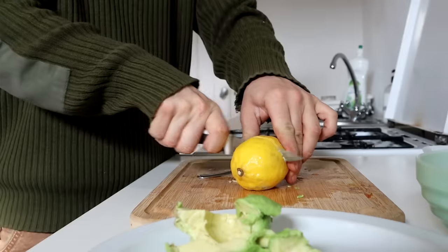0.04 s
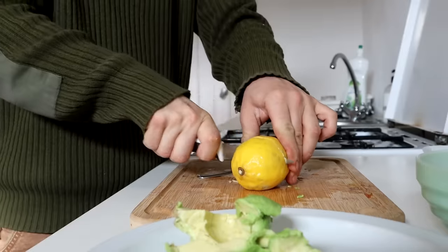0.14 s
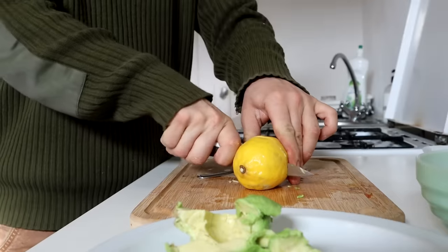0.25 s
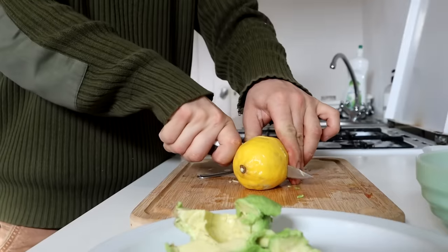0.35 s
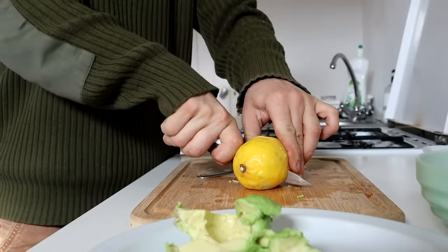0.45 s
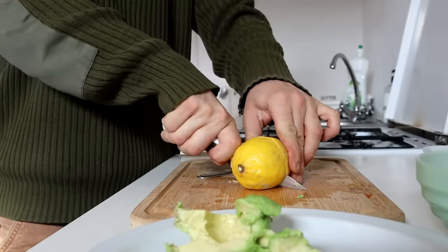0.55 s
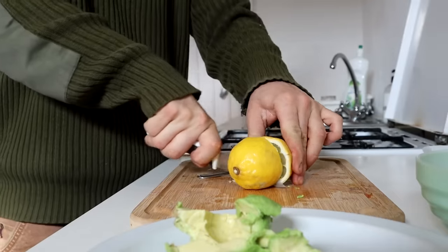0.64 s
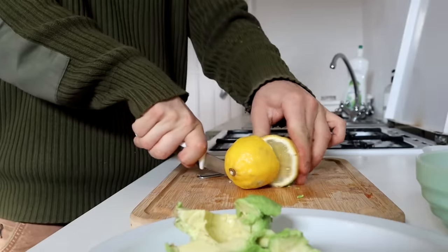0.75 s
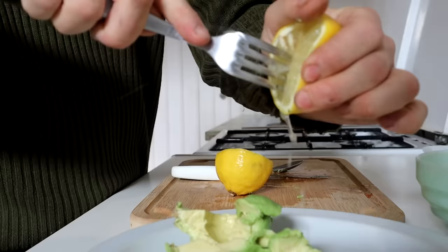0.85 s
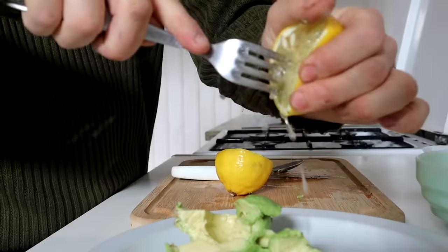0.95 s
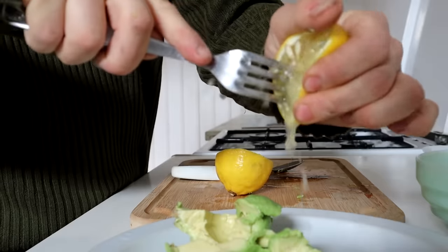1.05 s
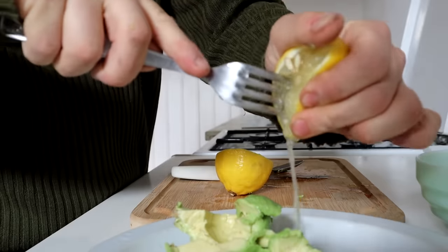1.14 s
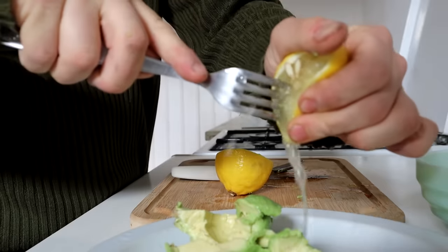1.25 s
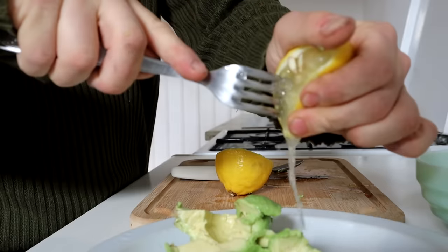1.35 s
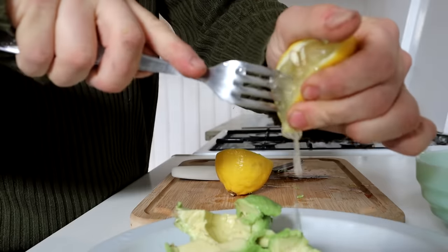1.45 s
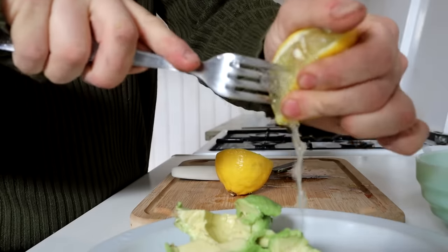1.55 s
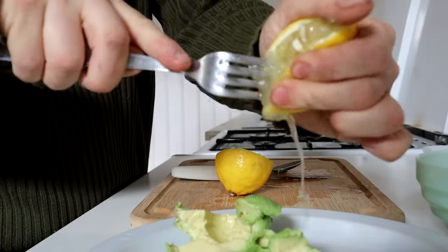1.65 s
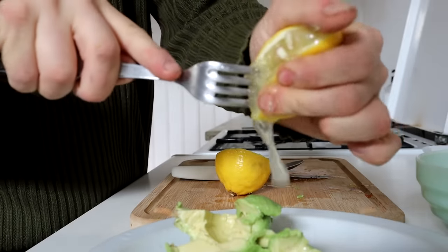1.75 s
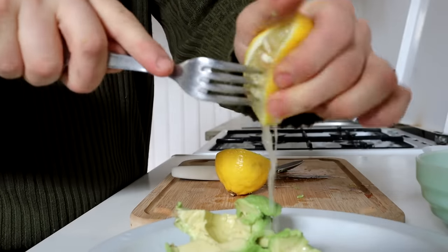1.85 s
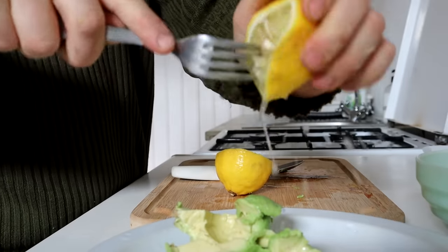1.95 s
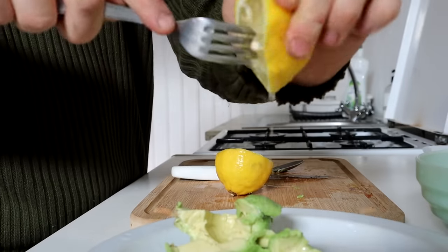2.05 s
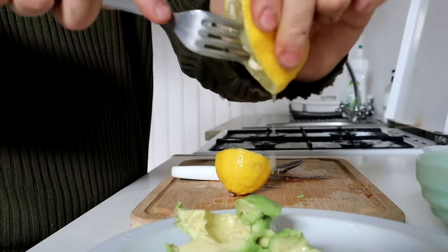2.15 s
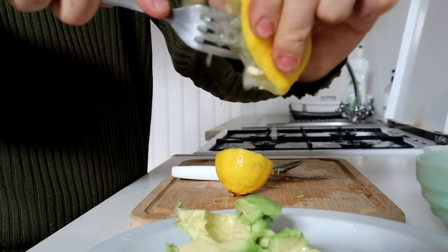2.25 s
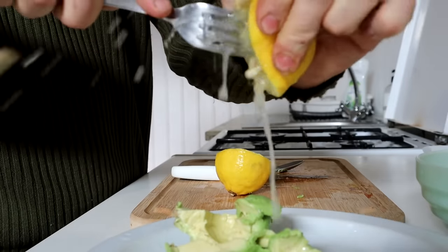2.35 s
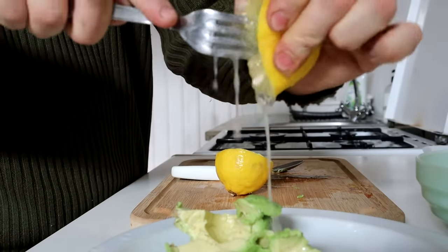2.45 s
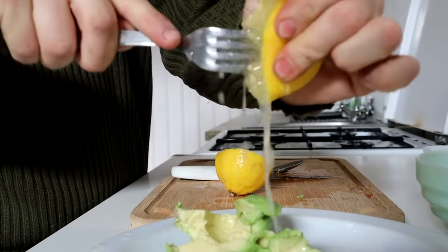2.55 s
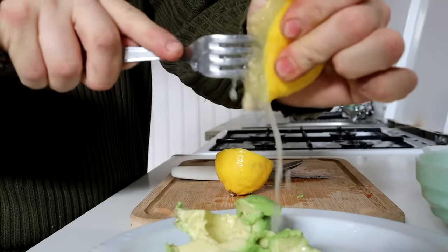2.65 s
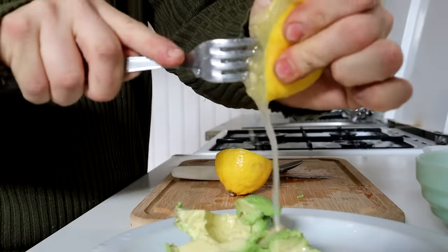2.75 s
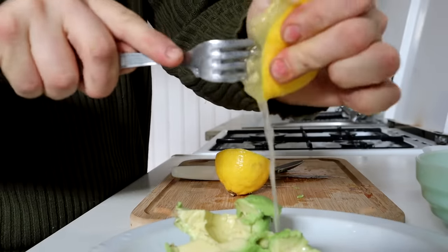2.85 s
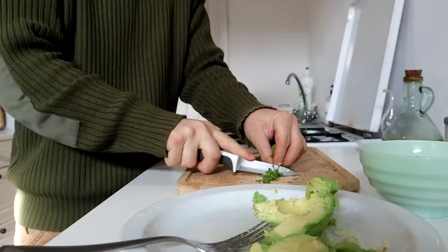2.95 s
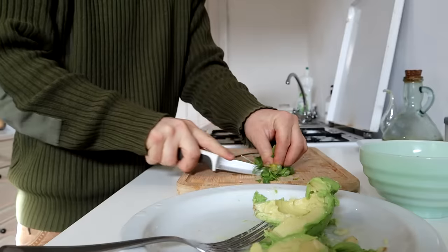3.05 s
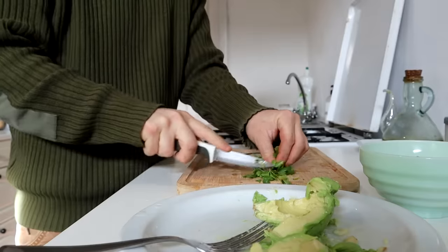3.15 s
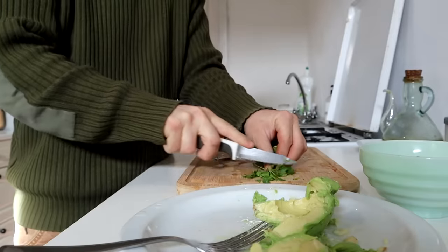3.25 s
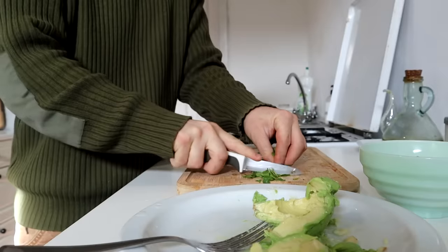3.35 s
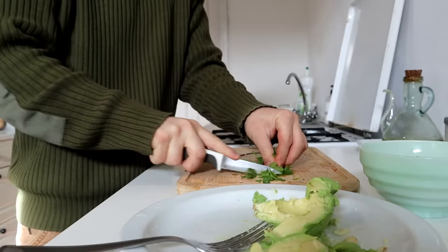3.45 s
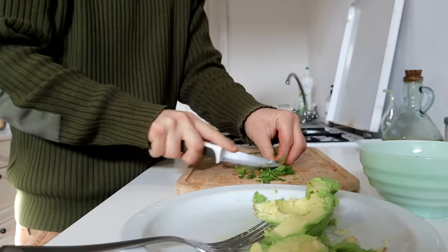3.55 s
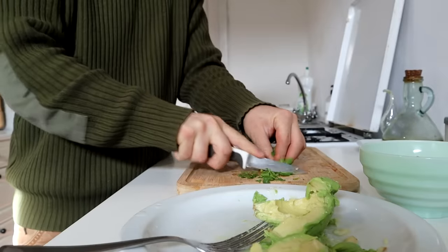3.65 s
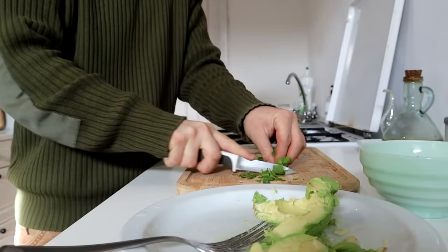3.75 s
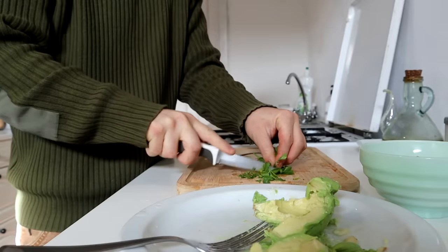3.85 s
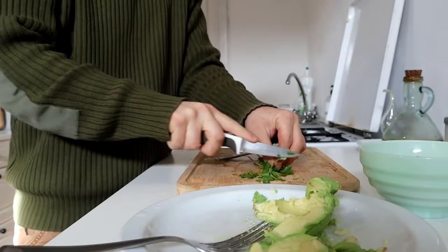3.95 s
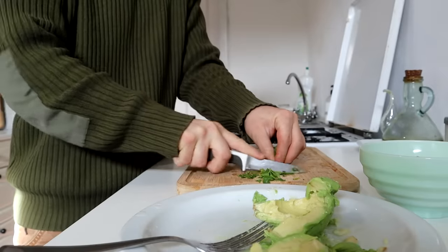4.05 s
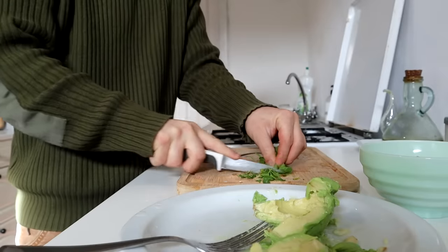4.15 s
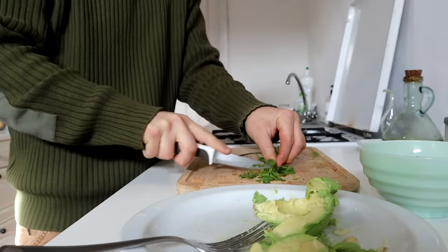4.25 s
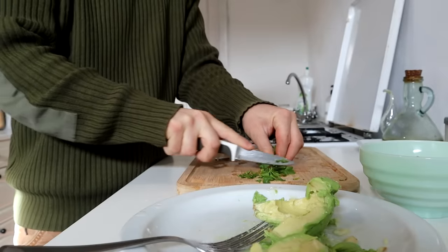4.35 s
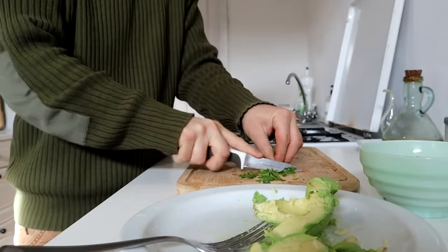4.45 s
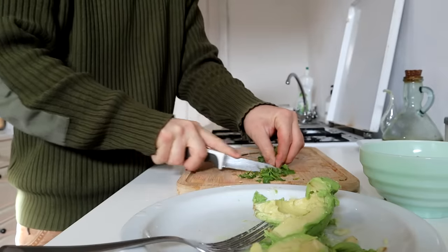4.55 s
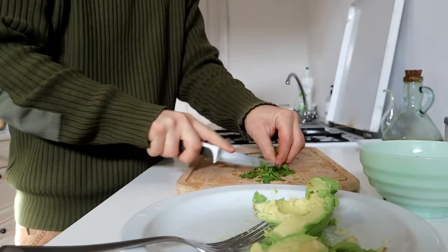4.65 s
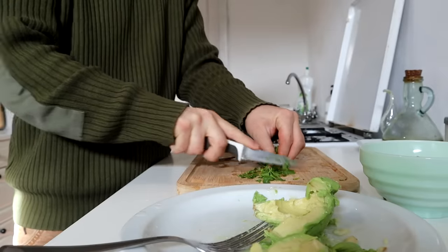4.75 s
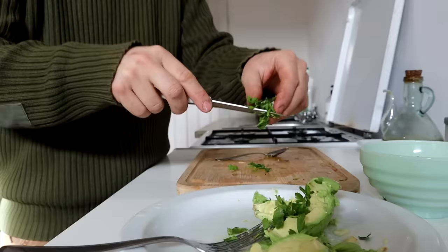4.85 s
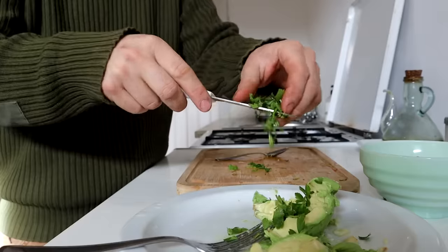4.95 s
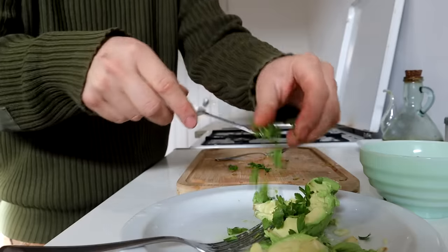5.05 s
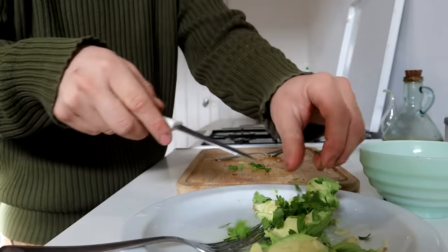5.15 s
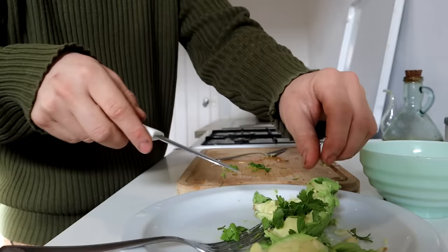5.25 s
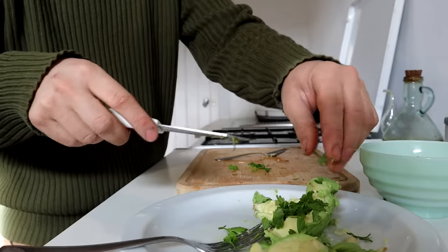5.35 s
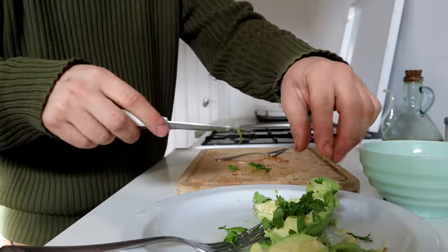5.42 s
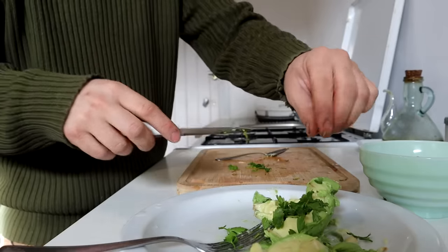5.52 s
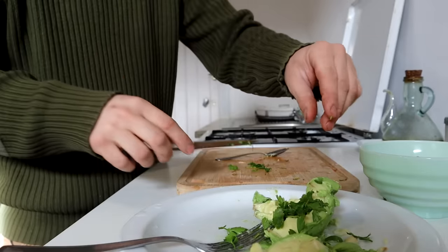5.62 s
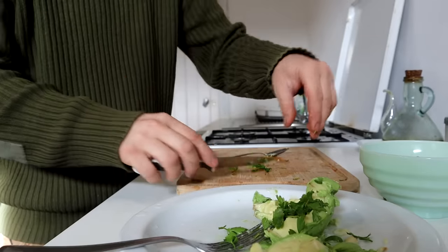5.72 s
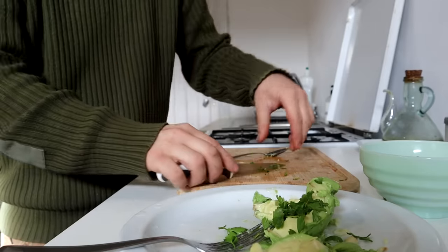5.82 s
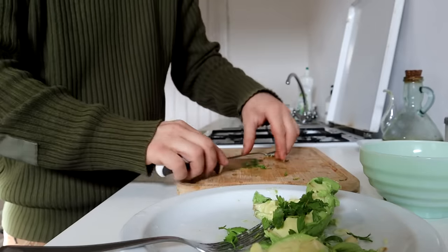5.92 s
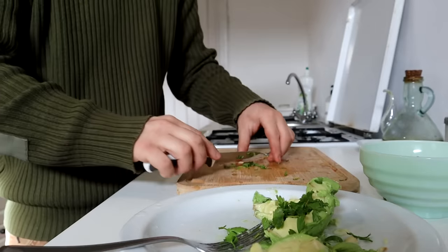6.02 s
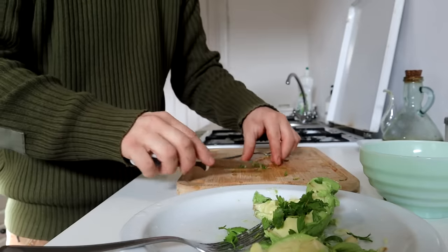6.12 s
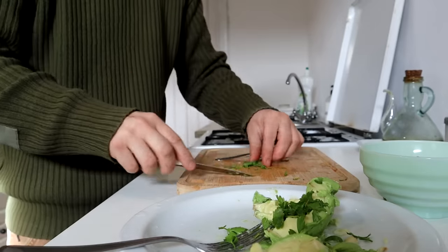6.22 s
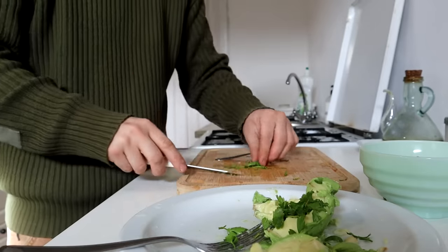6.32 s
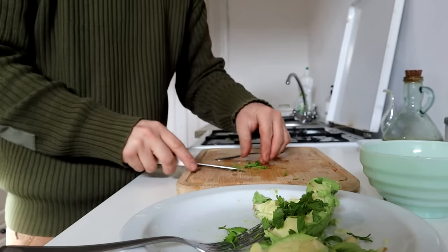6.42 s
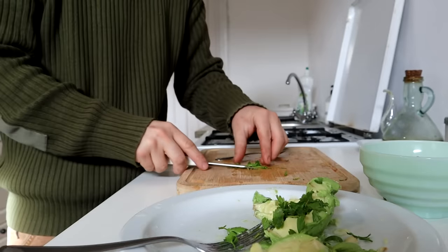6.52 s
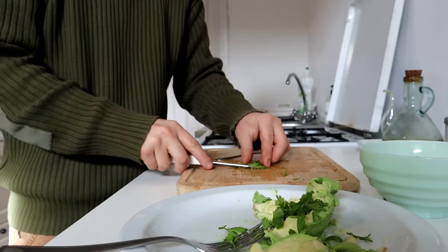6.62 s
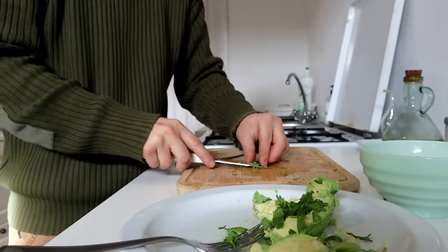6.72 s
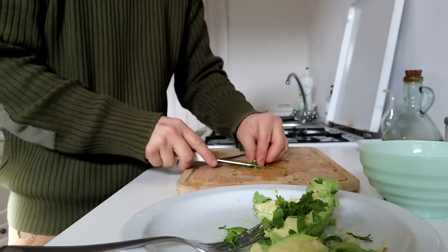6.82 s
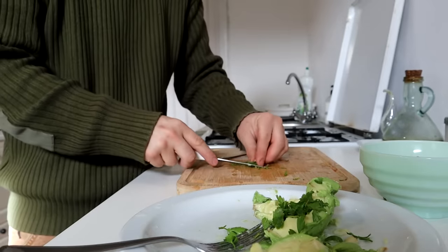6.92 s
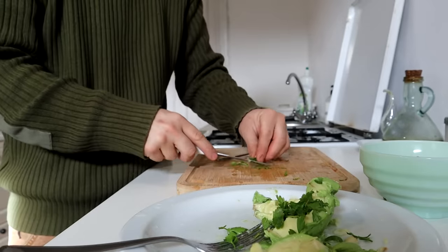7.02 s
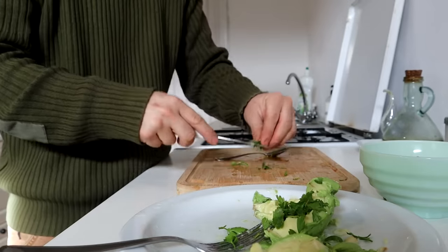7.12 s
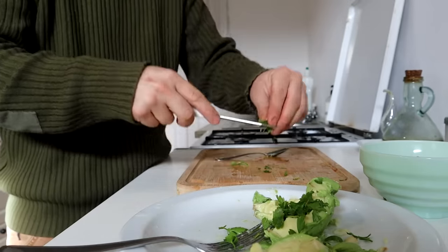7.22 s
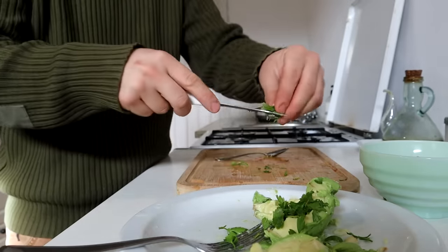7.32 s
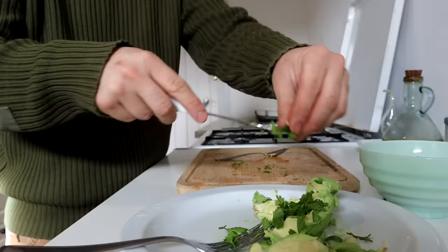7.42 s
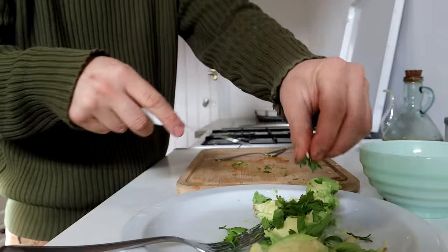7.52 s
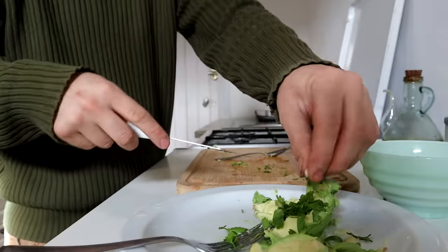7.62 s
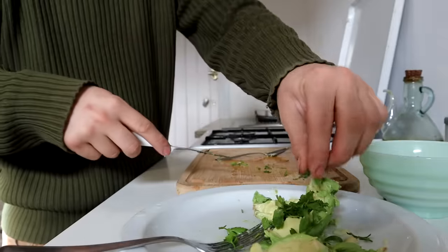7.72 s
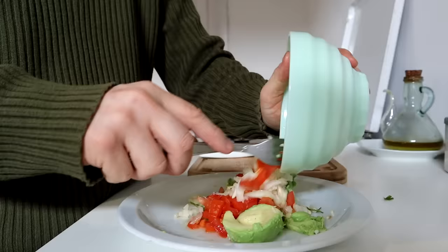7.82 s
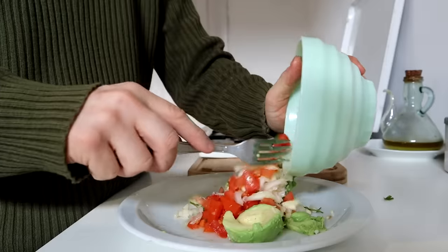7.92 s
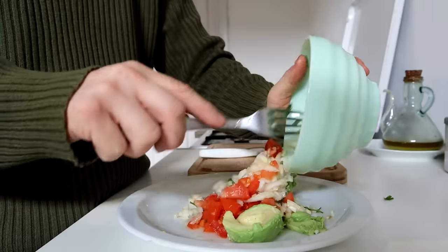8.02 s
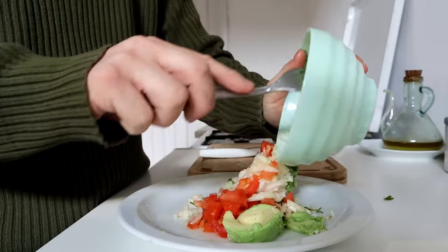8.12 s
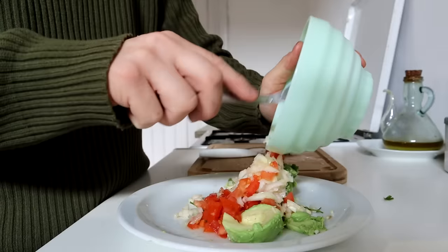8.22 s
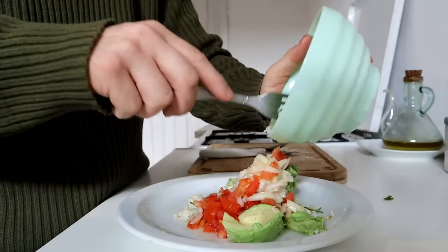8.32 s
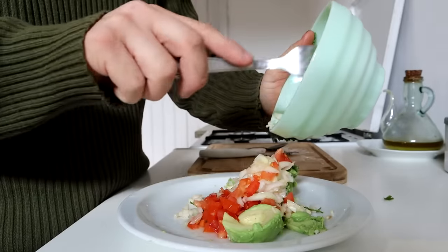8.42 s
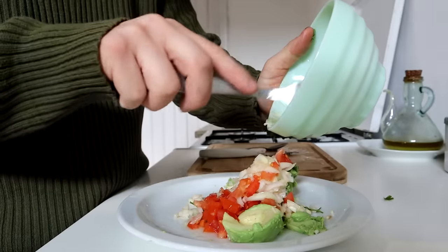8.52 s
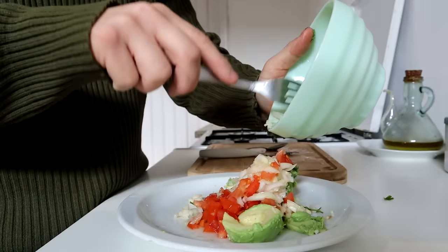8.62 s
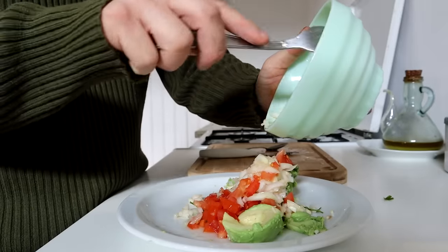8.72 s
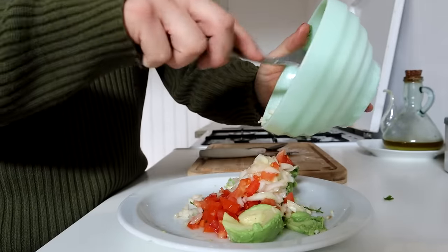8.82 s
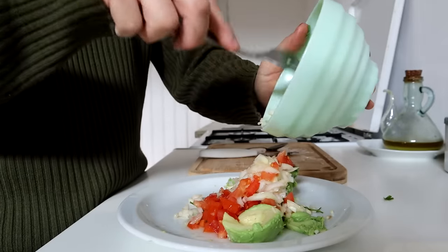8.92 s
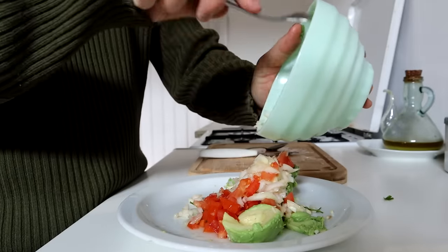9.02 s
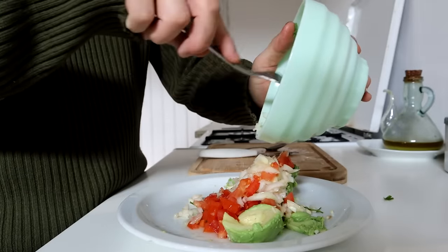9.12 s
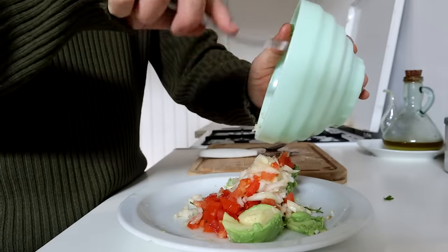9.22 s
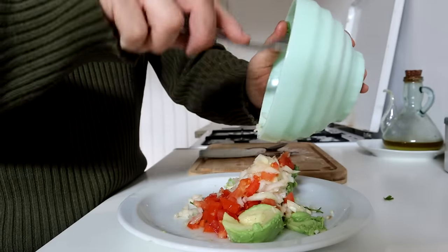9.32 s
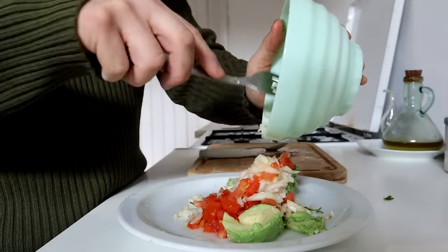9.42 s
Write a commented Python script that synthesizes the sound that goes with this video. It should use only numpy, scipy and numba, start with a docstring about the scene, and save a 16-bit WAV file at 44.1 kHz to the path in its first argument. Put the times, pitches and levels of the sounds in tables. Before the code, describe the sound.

Food preparation heard from very near. Dry sawing and small wooden knocks come first, then wet pulpy crackle with snapping cells. Sharp knife blows hit a board, then the blade gathers scraps quietly, with one solid knock and thin metallic scrapes. Bright irregular fork strikes and short scrapes on a ceramic bowl end it, loudest of all, over soft air and short hard-walled reverberation.

```python
"""A quiet kitchen with tiled walls, the microphone close to the work, in five passages joined by edits.
First a knife saws a lemon on a wooden board: noisy slips and blows ring board, counter and cabinet.
Then a fork squeezes out the juice in popping cells, wet crackle and gliding notes. The blade chops and
gathers herbs and taps a plate. Last a fork clinks and scrapes in a ceramic bowl, a bank of ringing modes.
Air and a low rumble lie under it all; the recorder's gain control ducks under the blows and peaks clip."""
import sys
import numpy as np
from scipy import signal
from scipy.fft import rfft, irfft
from scipy.io import wavfile
from scipy.ndimage import uniform_filter1d
from numba import njit

SR = 44100
rng = np.random.default_rng(int(sys.argv[2]) if len(sys.argv) > 2 else 0)


def master_out(mix):
    """Clip the mix to full scale and print it as 16-bit PCM to the path in sys.argv[1]."""
    frames = np.transpose(np.atleast_2d(mix))
    ceiling = np.clip(frames, -1, 1)
    pcm = np.round(ceiling * 32767).astype(np.int16)
    wavfile.write(sys.argv[1], SR, pcm)


N = 417614

# start of each passage, then the end: time_s
PASSAGES_S = [0, .93, 2.99, 4.93, 7.89, 9.47]
# knife blows on the board: start_s, level_db (before overload), then against it thud_db, edge_db, tick_db
KNOCKS = [(0.063, -41, 5, 15, -7), (0.1196, -41, 12, 12, 16), (0.2426, -23.5, 2, 8, -9),
          (0.2702, -16.5, -1.5, -8, -16), (0.451, -26.5, 7.5, -8, 1), (0.521, -24.5, -7, 7, 9),
          (0.7702, -25.5, -34, -5, 17.5), (0.78, -29, -24, 12, 12), (0.826, -21, -35, -13, -4),
          (3.031, -15, -9, -4.5, 1), (3.052, -36, -1, -7, 20), (3.196, -58, -7, -7, 27),
          (3.222, -51, -7, -7, 23), (3.2435, -41.5, -5, -12, 28), (3.374, -10.5, -7, 8.5, -25),
          (3.729, -12.5, -3.5, 8.5, -38), (4.1, -11.5, -3.5, 13, -31), (4.5052, -38.5, 9, 15.5, 21),
          (4.757, -49.5, -7, 17, 22.5), (4.8685, -35, -7, 4, 19), (4.8726, -14.5, -4.5, 10, 1),
          (5.6162, -58.5, -23, 21, 21), (5.8787, -11, -7.5, -17, -24), (6.2647, -15, -6, 3.5, -3.5),
          (7.001, -50, -8, -9, 17.5), (7.0504, -53.5, -22, -17, 30)]
# resonances of the wooden board, the counter, the cabinet: pitch_hz, width_hz, level_db
BOARD = [(1334, 375, 7.5), (1678, 373, 10), (1830, 556, 11.5), (2215, 322, 17.5), (2656, 142, 17.5),
         (3750, 585, 12.5), (4360, 680, 8.5), (5340, 1200, 2)]
COUNTER = [(235, 215, -2.5), (332, 99, -0.5), (439, 58, 2), (602, 51.4, 3.5), (809, 148, -1.5),
           (1010, 296, -9.5)]
CABINET = [(103, 10, -4), (123, 44, 1.5), (154.3, 28.5, 3.5), (192, 54, -4.5)]
# rings of the blade dragged flat: pitch_hz, width_hz, level_db
BLADE = [(630, 23, -0.5), (948, 37, -4), (1270, 48, -10), (2130, 29, 1), (2610, 28, -9), (3500, 150, -14),
         (5130, 150, -17), (6600, 740, -17.5)]
# the blade touches the plate: start_s, level_db
TAPS = [(5.198, -26), (5.228, -19.5)]
# modes of the plate: pitch_hz, level_db, t60_s (longest allowed ring is set in knife)
PLATE = [(837, 3, 0.057), (1760, 0, 0.056), (2700, 10.5, 0.019), (2966, -1, 0.48), (3350, -1, 0.21)]
# blade sawing, sliding and gathering, a row a stroke: start_s, swell_s, fade_db_per_s, rasp_db, hiss_db,
# counter_db, cabinet_db, blade ring (gain against the rasp)
STROKES = [(0.0, 0.005, 315, -43, -47, -69, -48, .1), (0.06, 0.0047, 38, -34.5, -45, -49, -35, 0.092),
           (0.118, 0.0063, 114, -28.5, -38.5, -38.5, -33.5, 0.092),
           (0.212, 0.052, 207, -25.5, -35, -26, -25.5, .1),
           (0.445, 0.0033, 395, -34.5, -37.5, -44, -22.5, .1),
           (0.514, 0.0051, 83, -29.5, -32, -33.5, -27, .1),
           (0.631, 0.04, 70, -23.5, -26.5, -33, -28.5, 0.11), (0.76, .02, 129, -32, -30, -46, -32.5, .1),
           (2.997, 0.033, 88, -28.5, -31, -33.5, -44, .15), (3.19, 0.023, 90, -55, -39.5, -80, -64, .15),
           (3.33, 0.046, 900, -50, -31.5, -63, -69, .15), (3.376, 0.09, 72, -37, -30, -37.5, -52, .15),
           (3.64, 0.055, 104, -51, -39, -69.5, -73.5, .15), (3.69, 0.025, 892, -60, -35, -60, -62, .15),
           (3.73, 0.099, 123, -30.5, -32.5, -37, -49, 0.17), (4.075, 0.023, 898, -53, -31, -58, -66, .15),
           (4.1, 0.079, 81, -29, -34, -68, -46, 0.16), (4.503, 0.0056, 246, -41, -30.5, -32, -34.5, 0.24),
           (4.541, 0.056, 112, -36, -29, -37.5, -52, 0.078), (4.835, 0.033, 900, -69, -35, -79, -64, 0.11),
           (4.875, 0.058, 100, -54, -39, -45, -51, .1), (5.05, 0.07, 73, -48, -44.5, -59, -69, .25),
           (5.879, 0.088, 74, -41, -59, -35, -38, 0.33), (6.265, 0.033, 119, -31.5, -49, -76, -44, 0.18),
           (6.431, 0.016, 49, -37, -36.5, -46.5, -64, 3.5), (6.578, 0.017, 160, -42, -66, -37.5, -70, 0.33),
           (6.76, 0.01, 99, -43.5, -82, -40, -57, .3), (6.795, 0.01, 298, -36.5, -38, -47, -64, 1.1),
           (6.93, 0.04, 254, -50, -45, -87, -57, 0.11), (7.35, 0.12, 39, -54.5, -49.5, -84, -67, .1),
           (7.68, 0.054, 37, -50, -87, -59.5, -77, 0.091)]
# a stroke starts this far under its top: rasp_db, hiss_db, counter_db, cabinet_db
STROKE_ONSET_DB = [-12.5, -20.5, -20, -8.5]
# half octaves of the blade's hiss: pitch_hz, level_db
HISS_BANDS = [(5400, 7.5), (7400, 4.5), (10200, 6.5), (14000, 7.5)]
# rough notes and bands of noise during the knife work: start_s, length_s, from_hz, to_hz, width_hz, level_db
ROUGH_NOTES = [(.115, 0.12, 398, 416, 39.3, -36), (.26, 0.095, 474, 452, 34.2, -36),
               (.64, 0.2, 1505, 1456, 168, -30.5), (5.885, 0.24, 1490, 1100, 447, -34),
               (6.595, 0.076, 420, 436, 46.3, -38.5), (4.56, 0.16, 3750, 3990, 300, -35),
               (5.885, .15, 330, 210.4, 90, -31.5), (6.265, 0.023, 4230, 4080, 150, -25),
               (6.95, 0.069, 5800, 5750, 300, -46)]
# lemon cells and pips popping: start_s, level_db (before overload), pitch_hz, snap_db (against the level)
POPS = [(0.938, -24, 2820, 0.5), (1.075, -22, 5200, -33), (1.203, -25.5, 3830, -13),
        (1.2303, -21.5, 3050, -2), (1.258, -5.5, 3910, -25), (1.297, -20.5, 4020, -5),
        (1.347, -22.5, 5440, -7), (1.3998, -31, 3070, 11.5), (1.445, -27, 3670, -14),
        (1.558, -24, 3340, -25), (1.6654, -13, 3200, 11), (1.698, -13.5, 3060, -22),
        (1.7146, -16.5, 5100, 0), (1.149, -27, 3080, -7), (1.777, -14.5, 3700, -3), (1.8256, -16, 4800, -5),
        (1.841, -18, 3700, 7.5), (1.887, -31, 4500, 16), (1.897, -1.5, 3750, -28), (1.905, -12, 4800, -27),
        (1.917, -13, 5200, -14), (1.927, -14.5, 3500, 2), (1.945, -21, 1800, 16.5), (1.9986, -17, 1910, 2),
        (2.0342, -31, 3560, 19), (2.117, -25, 6360, 7.5), (2.161, -24, 2700, 0), (2.2326, -25, 3550, -17),
        (2.2523, -28, 4960, -12), (2.3223, -16.5, 3700, 4.5), (2.441, -21, 4940, -13),
        (2.4938, -27, 3800, -9), (2.527, -17.5, 5640, -9), (2.5695, -17.5, 3200, -11),
        (2.6521, -19.5, 5750, -15), (2.684, -33, 8100, -8), (2.717, -14, 6500, -20),
        (2.752, -22, 4600, -16), (2.792, -19, 3700, -34), (2.913, -20, 3280, -18), (2.942, -33, 8000, -6),
        (2.9667, -21, 3330, -28), (2.981, -20, 2780, -5)]
# the hand squeezing the lemon onto the fork: time_s, squelch_db, fizz_db
SQUEEZE = [(0.93, -38.5, -46.5), (1.1, -43.5, -108), (1.28, -46.5, -47), (1.62, -46.5, -44.5),
           (1.72, -35.5, -36), (1.84, -47, -47.5), (1.95, -41, -36.5), (2.12, -49, -50.5),
           (2.23, -30.5, -31.5), (2.37, -36, -40), (2.8, -39.5, -37), (2.95, -55, -45), (2.965, -34.5, -39),
           (2.99, -24.5, -33)]
# spectrum of the wet pulp: pitch_hz, density_db_per_hz
PULP = [(530, -45), (900, -7), (1530, -0.5), (1820, 2.5), (2140, -0.5), (3430, 7), (4010, -29),
        (4450, -3.5), (9000, -12.5), (11700, -89), (19800, -120)]
# half octaves of the juice's fizz: pitch_hz, level_db
FIZZ_BANDS = [(4800, 7.5), (6800, 7), (9600, 1.5), (13500, 2.5)]
# sizes of the small cells: pitch_hz
DROPLETS_HZ = [2790, 3700, 5100, 5800, 7340, 8950, 10730]
# air between the tines, squeezed and released: start_s, length_s, from_hz, to_hz, width_hz, level_db
POCKET = [(0.95, 0.19, 2700, 2320, 402, -41.5), (1.255, 0.24, 3980, 4170, 260, -47),
          (1.524, 0.055, 3000, 3200, 294, -39), (2.173, 0.091, 2700, 2570, 300, -34),
          (2.355, 0.12, 7840, 4620, 298, -34), (2.48, .23, 3750, 2705, 300, -34)]
# fork on the bowl: start_s, level_db (before overload), then against it body_db (under 2 kHz),
# clang_db (2-4.6 kHz), ring_db (5.6-10 kHz), sheen_db (over 10 kHz); freedom to ring (0-1), contact_ms,
# and the two notes the landing place favours, note_hz, other_hz
CLINKS = [(7.9015, -34.5, 0, -12, 4, 5, 0.77, 1.4, 5340, 15500),
          (7.91, -23.5, -6, -10, -6, -12, 0.7, 2.2, 5060, 5340),
          (7.982, -31, -7, -7, -10, -4, 0.45, 2.5, 5060, 5340),
          (8.322, -8, -2, 4, 6.5, 13.5, 0.59, 0.93, 4064, 5910),
          (8.337, -26, -11, 6, 15, 18.5, 0.42, 1.6, 5910, 7220),
          (8.341, -30.5, -12, 16.5, 10.5, 23, 0.64, 3.7, 4064, 7220),
          (8.5042, 7.5, -10.5, 0.5, 0.5, -2.5, 0.31, 2.5, 5340, 7870),
          (8.5105, -2, -16.5, -5, -6, 0, 0.86, 2, 1280, 5216),
          (8.537, -2, -12.5, -9, -17, -10, 0.61, 5.4, 5340, 11070),
          (8.585, -10.5, -37, -3.5, -17, 10, 0.33, 3.2, 4325, 14700),
          (8.627, -9.5, -29, -6, -9, -2, 0.73, 4.4, 5910, 11070),
          (8.658, -25, -10, 3, -8, 5, 0.42, 3.5, 9500, 13300),
          (8.783, -7, -12, -2, 8.5, 13, 0.21, 0.85, 5910, 10800),
          (8.794, -12.5, -11, -5.5, -9, 10, 0.3, 1.2, 5600, 13300),
          (8.8292, -2.5, -12.5, -3, -3, 10, 0.21, 1.4, 4325, 10800),
          (8.839, -5.5, -12, -5.5, -4, 7, 0.71, 1.1, 5060, 10330),
          (8.851, -16.5, -17, -15, 4, 13, 0.11, 1.8, 5060, 14700),
          (8.8906, -24.5, 1, -0.5, 2, 3, 0.58, 2.2, 315, 10330),
          (9.063, -4.5, -15.5, -9.5, 1, 15, 0.33, 1.3, 5600, 10800),
          (9.074, -24, -8, -9, -6, -3, 0.2, 1.5, 6500, 10800),
          (9.1405, -21, -11, -21, 3, 8.5, 0.42, 2.1, 4690, 11600),
          (9.171, -19.5, -1, -23, -2, -12, 0.37, 8.6, 315, 4690),
          (9.18, -8, 0.5, 0.5, -1, 0, 0.24, 3.6, 1270, 4690),
          (9.187, -21, -5, -3, 2, 8, 0.27, 6.7, 5910, 6110),
          (9.205, -29, 6, -8, 13, 17.5, 0.23, 1.4, 7870, 15100),
          (9.316, -33, 3, -20, 10, 13, 0.15, 3.5, 7370, 12100),
          (9.321, -22.5, -11, -26, 9, 17.5, 0.43, 2.7, 7370, 6500),
          (9.37, -31, 1, -21, 11, 26, 0.21, 2.1, 9500, 10330),
          (9.377, -29, -1, -4, 13, 22.5, 0.32, 2.9, 9500, 10330),
          (9.401, -37, -2, -5, 13, 13, 0.13, 1.7, 6110, 10330),
          (9.43, 0.5, -3.5, 4, 9, 10, 0.37, 1.02, 7370, 9500)]
# modes of the bowl ringing freely: pitch_hz, level_db, t60_s
BOWL = [(315, -5, 0.031), (690, -7.5, 0.053), (985, -14, 0.059), (1270, -8, 0.25), (1754, 1, 0.043),
        (2360, -5, 0.091), (3023, 10, 0.17), (3210, 8, 0.099), (4064, 2, 0.2), (4325, 0.5, 0.39),
        (4690, -4, 0.13), (5090, 10, 0.2), (5200, 11, .2), (5340, 14.5, 0.16), (5570, 2, 0.11),
        (5910, -10, 0.12), (6110, -14, 0.073), (6500, -32, 0.098), (7220, -23, 0.33), (7370, -28, 0.14),
        (7870, -21, 0.18), (9500, -11.5, 0.25), (10330, -22, 0.12), (10800, -11.5, 0.084),
        (11070, 7.5, 0.055), (11600, -6, 0.2), (12100, -3, 0.055), (12830, -9, 0.14), (13300, -1, 0.1),
        (16700, -2.5, 0.13), (14700, -36, 0.11)]
# borders of the bowl's ranges: pitch_hz
BOWL_EDGES_HZ = [200, 2000, 4600, 5600, 10000, 16500]
# tines dragged over the glaze, and food sliding at 8.08 s, a row a stroke: start_s, swell_s,
# fade_db_per_s, low_db (under 1 kHz), middle_db (1-10 kHz), high_db (over 10 kHz), singing_db
SLIDES = [(7.895, 0.012, 129, -55.5, -34.5, -40, -35.5), (8.08, 0.23, 9, -49, -50.5, -53, -61),
          (8.323, 0.0078, 199, -31.5, -31.5, -43, -50), (8.51, 0.031, 74, -65, -30.5, -45, -46),
          (8.61, 0.016, 134, -69, -31, -62, -31.5), (8.823, 0.0082, 258, -30.5, -23.5, -39, -39),
          (8.875, 0.0082, 193, -32, -53, -44, -52), (9.065, 0.024, 54, -67, -42, -67, -55),
          (9.13, 0.041, 179, -33.5, -29, -57, -40), (9.36, 0.017, 247, -40, -34.5, -44, -45),
          (9.43, 0.015, 100, -44, -39, -36, -38)]
# short low one-sided thumps under a pop, a knock and a clink: start_s, level_db, length_s (plus 3 samples)
THUMPS = [(1.665, -7.5, 0.00012), (5.887, -22, 0.0028), (8.5054, -11, 0.0026)]
# steady low rumble, one level for each passage: level_db
RUMBLE_DB = [-46, -79, -56, -76, -75]
# spectrum of the room air: pitch_hz, density_db_per_hz
AIR = [(18, -49), (30, -14.5), (167, -8), (200, -8), (314, -8.5), (349, -5), (387, -10.5), (518, -4),
       (639, -11), (5410, -16.5), (8040, -24.5), (15100, -24.5), (16400, -58)]
# how long the tiled room rings: pitch_hz, t60_s
ROOM_T60 = [(125, 0.2), (500, 0.48), (2000, 0.43), (5000, 0.51), (12000, 0.23)]

AIR_DB = -51.5
DRIP_HZ, DRIP_DB = 1800, -26  # juice landing on the plate
CRACKLE_DB = -4.5  # small cells bursting, against the fizz
GLIDE_SETTLE, GLIDE_FADE_DB = 3.6, 5.5  # settling rate of the pitch, sinking of the level, over one note
FAVOUR_DB = 4.5  # a favoured note against the strongest mode of its range
CRACK_DB = 3  # crack of a 1 ms contact against the ring; softer contacts crack less
SLIDE_ONSET_DB = -12.5
RETOUCH_T60_S = 0.21  # the next touch of the fork damps what still rings
TOP_HZ = 16000  # the recorder passes nothing much above


def knife():
    """Blows ring board, counter and cabinet; an edge-on blow wakes the board's upper modes and ticks."""
    out, ticks, t = np.zeros(N), np.zeros(N), np.arange(SR // 6) / SR
    push = (t == 0) * 1.
    flat, edge = body(push, BOARD[:2]), body(push, BOARD[2:])
    flat = signal.sosfilt(signal.butter(4, 2100, fs=SR, output="sos"), flat)
    thud = body(push, COUNTER) + 0.38 * body(push, CABINET)
    for s, db, thud_db, edge_db, tick_db in KNOCKS:
        db = overload(db, reach_db=12.5)
        tick = band(rng.standard_normal(len(t)) * np.exp(-t / 0.001), 4360, 8700)
        add(out, s, peak(flat, db) + peak(thud, db + thud_db) + peak(edge, db + edge_db))
        add(ticks, s, peak(tick, db + tick_db))
    plate = sum(undb(db) * ring(push, hz, min(t60, .045)) for hz, db, t60 in PLATE)
    for s, db in TAPS:
        add(out, s, peak(plate, db))
    return kitchen(out, -5.5) + kitchen(ticks, -13.0)


def rubbing():
    """The edge catches on peel, stalks and grain: dense slips into board, blade and counter, with a fine hiss."""
    each = list(strokes([row[:-1] for row in STROKES], STROKE_ONSET_DB))
    rasp, hiss, low, deep = together(each)
    # the next stroke damps the blade
    t, lifts = np.arange(N) / SR, [row[0] for row in STROKES[1:]] + [N / SR]
    sing = together(g[0] * row[-1] * (t < lift) for g, row, lift in zip(each, STROKES, lifts))
    slips = grit(1800, 2.2)
    wood = unit(unit(body(slips, BOARD)) + 2.0 * unit(band(grit(3000, 0.73), 980, 4300)))
    steel = .5 * unit(body(slips, BLADE))
    fine = grit(5000, 2.3) + .5 * grit(120, 2.0)
    counter = unit(body(grit(600, 0.73), COUNTER))
    cabinet = unit(band(body(grit(260, 2.0), CABINET), 86, 640))
    out = rasp * wood + sing * steel + low * counter + deep * cabinet
    out += hiss * patchy(fine, HISS_BANDS, 0.018, patch_db=4.0)
    return out + gliding(ROUGH_NOTES)


def lemon():
    """Bursting cells are short rings with a snap, over wet crackle and the gliding note of an air pocket."""
    squelch, fizz = gains(SQUEEZE)
    wet = sum(undb(db) * np.sqrt(hz) * unit(ring(grit(330, 2.6), hz, 16 / hz)) for hz, db in PULP[2:-2])
    wet = unit(band(wet, 1300, 12000)) + .5 * shaped(PULP)
    gurgle = patchy(grit(880, 2.7), PULP[3:7], .02, patch_db=12.5)
    spray = patchy(grit(3000, 2.2), FIZZ_BANDS, .012, patch_db=4.5)
    crackle = unit(sum(ring(grit(30, 2.5), hz, .005) for hz in DROPLETS_HZ))
    out = squelch * (unit(wet) + 0.42 * gurgle) + fizz * (spray + undb(CRACKLE_DB) * crackle) + gliding(POCKET)
    t = np.arange(SR // 10) / SR
    for s, db, hz, snap_db in POPS:
        chance = rng.standard_normal((2, len(t)))
        burst = chance[0] * np.exp(-t / 0.0013)
        cell = peak(ring(burst, hz, np.clip(27 / hz, 0, .016)), 0)
        cell += peak(band(burst, 0.55 * hz, 1.18 * hz), -11)
        cell += peak(ring(burst, DRIP_HZ, 0.087), DRIP_DB)
        snap = band(chance[1] * np.exp(-t / 0.0012), 1870, 17600)
        db = overload(db, reach_db=1.5)
        add(out, s, peak(band(cell, 1840, 18000), db) + peak(snap, db + snap_db))
    return out


def bowl():
    """Clinks and slides excite the same modes; where the fork lands sets the share of each range."""
    out = clinks() + slides()
    return band(out, 130, .45 * SR)


def clinks():
    """Each touch starts decaying modes and a noisy crack, balanced range by range."""
    out, t = np.zeros(N), np.arange(SR // 3) / SR
    hz, mode_db, t60 = np.transpose(BOWL)
    zone = np.searchsorted(BOWL_EDGES_HZ, hz) - 1
    top_db = np.array([mode_db[zone == z].max() for z in zone])
    touches = [row[0] for row in CLINKS[1:]] + [N / SR]
    for (s, db, *shares, free, contact_ms, note_hz, other_hz), touch in zip(CLINKS, touches):
        db, contact = overload(db, reach_db=-4.5), np.clip(contact_ms, .5, 9) / 1000
        luck = rng.standard_normal((2, len(hz)))
        burst = rng.standard_normal(len(t)) * t * np.exp(-t / contact)
        varied_hz = hz * (1 + 0.0022 * luck[1])  # each mode's pitch varies a little at random
        # tines left on the glaze damp it
        fade = np.exp(-np.log(1000) * np.outer(1 / (t60 * np.clip(free, .1, 1)), t))
        distance = np.minimum(np.log(hz / note_hz) ** 2, np.log(hz / other_hz) ** 2)
        favour = np.exp(-distance / .01 ** 2)
        place_db = mode_db + 3 * luck[0] + favour * (top_db + FAVOUR_DB - mode_db)
        modes = undb(place_db)[:, None] * np.sin(2 * np.pi * np.outer(varied_hz, t))
        # loose tines make each ring waver
        steps = np.repeat(rng.standard_normal((len(hz), len(t) // 75)), 75, axis=1)
        rattle = 1 + 1.3 * (1.08 - np.clip(free, 0, 1)) * uniform_filter1d(steps, size=75, axis=1)
        damping = 1000. ** (-(t + s - touch).clip(0) / RETOUCH_T60_S)
        modes = modes * rattle * fade * damping * (1 - np.exp(-t / contact))
        # the range 4.6-5.6 kHz is the reference, at 0 dB
        for z, zone_db in enumerate(np.insert(shares, 2, 0)):
            crack = band(band(burst, 360, 14300), BOWL_EDGES_HZ[z], BOWL_EDGES_HZ[z + 1])
            tone = peak(modes[zone == z].sum(axis=0), 0)
            add(out, s, peak(tone + peak(crack, CRACK_DB) / (1000 * contact), db + zone_db))
    return out


def slides():
    """Sliding contact sends random clicks through shortened bowl modes and straight into three noise bands."""
    chatter = grit(1200, 2.6)
    *ranges, squeal = together(strokes(SLIDES, SLIDE_ONSET_DB))
    singing = [row for row in BOWL if row[0] < BOWL_EDGES_HZ[-2]]
    out = squeal * unit(sum(undb(db) * unit(ring(chatter, hz, .4 * t60)) for hz, db, t60 in singing))
    for gain, lo, hi in zip(ranges, (150, 1000, 10000), (1000, 10000, 16500)):
        modes = [row for row in BOWL if lo < row[0] < hi]
        tone = sum(undb(.5 * db) * unit(ring(chatter, hz, 0.1 * t60)) for hz, db, t60 in modes)
        out += gain * unit(unit(tone) + 4.5 * unit(band(chatter, lo, hi)))
    return out


def thumps():
    """Short low thumps, each a single one-sided hump of pressure."""
    out = np.zeros(N)
    for s, db, length in THUMPS:
        add(out, s, undb(db) * np.hanning(int(length * SR) + 3))
    return out


def rumble():
    """Steady low rumble: noise at 24-40 Hz, at a set level in each passage."""
    passage = np.searchsorted(PASSAGES_S[1:-1], np.arange(N) / SR)
    return undb(RUMBLE_DB)[passage] * unit(band(band(noise(), 24, 40), 24, 40))


def air():
    """Steady air of the room: noise with a set spectrum."""
    return undb(AIR_DB) * band(band(shaped(AIR), 42, .45 * SR), 40, .45 * SR)


def kitchen(dry, wet_db):
    """Tiled walls: octave bands of decaying noise; every edit cuts the tail short."""
    t, (hz, t60) = np.arange(SR) / SR, np.transpose(ROOM_T60)
    tail = 0
    for f in 90 * 2. ** np.arange(8):
        decay = 1000. ** (-t / np.interp(np.log(f), np.log(hz), t60))
        tail = tail + band(rng.standard_normal(SR), f / 2 ** .5, f * 2 ** .5) * decay
    tail = tail * (1 - np.exp(-t / 0.00049)) / np.sqrt(np.sum(tail ** 2))
    cuts = np.minimum((np.array(PASSAGES_S) * SR).astype(int), N)
    wet = [signal.fftconvolve(dry[a:b], tail)[:b - a] for a, b in zip(cuts, [*cuts[1:-1], N])]
    return dry + undb(wet_db) * np.concatenate(wet)


def strokes(rows, onset_db):
    """Gains of each stroke's dB columns: a swell, then a steady fade that the next edit cuts short."""
    for s, swell, fade_db, *levels in rows:
        edit = PASSAGES_S[np.searchsorted(PASSAGES_S, s, "right")]
        i, end = int(s * SR), min(int(edit * SR), N)
        since, gain = np.arange(end - i) / SR, np.zeros((len(levels), N))
        rise_db = np.outer(onset_db, 1 - since / abs(swell))
        shape_db = np.where(since < swell, rise_db, -abs(fade_db) * (since - swell))
        gain[:, i:end] = undb(levels)[:, None] * undb(np.minimum(shape_db, 0))
        yield gain


def together(parts):
    """Overlapping strokes add in power."""
    return np.sqrt(sum(p ** 2 for p in parts))


def gliding(rows):
    """Rough notes whose pitch settles while they fade: slow noise shifted up to a gliding carrier."""
    out, slips = np.zeros(N), [grit(700, 1.8) for _ in range(2)]
    for s, length, from_hz, to_hz, width_hz, db in rows:
        part, i = np.linspace(0, 1, int(length * SR)), int(s * SR)
        rough = [unit(band(x[i:i + len(part)] + 1e-9, 10, width_hz)) for x in slips]
        pitch_hz = to_hz + (from_hz - to_hz) * np.exp(-GLIDE_SETTLE * part)
        turn = 2 * np.pi * np.cumsum(pitch_hz) / SR
        gain = undb(db - GLIDE_FADE_DB * part) * np.sqrt(np.sin(np.pi * part).clip(0))
        add(out, s, gain * (np.cos(turn) * rough[0] + np.sin(turn) * rough[1]))
    return out


def patchy(x, bands, patch_s, patch_db):
    """Half-octave bands that each come and go in patches, rms 1."""
    k, out = int(patch_s * SR), 0
    for hz, db in bands:
        steps = np.repeat(rng.standard_normal(N // k + 1), k)
        walk = unit(uniform_filter1d(steps, size=k)[:N])
        out = out + undb(db + patch_db * walk) * unit(band(x, hz / 2 ** .25, hz * 2 ** .25))
    return unit(out)


def overload(db, reach_db):
    """Shifts the level of hard blows, from nothing at -17 dB to the whole reach at -11 dB and over."""
    return db + reach_db * np.clip((db + 17.0) / 6, 0, 1)


def grit(rate, spread_db):
    """Random clicks at a rate per second, many small and a few large, rms 1."""
    size_db = spread_db * np.minimum(rng.exponential(size=N), 4)
    return unit((rng.random(N) < rate / SR) * noise() * undb(size_db))


def ring(x, hz, t60):
    """One mode, a two-pole resonator; a unit impulse rings with amplitude 1."""
    r, w = np.exp(-np.log(1000) / (t60 * SR)), 2 * np.pi * hz / SR
    return signal.lfilter([0, np.sin(w)], [1, -2 * r * np.cos(w), r * r], x)


def body(x, peaks):
    """Resonances given by their widths, neighbours in opposite phase."""
    out = 0
    for k, (hz, width, db) in enumerate(peaks):
        out = out + (-1) ** k * undb(db) * width / 100 * ring(x, hz, np.log(1000) / (np.pi * width))
    return out


def shaped(points):
    """Noise with the given spectrum, rms 1."""
    f, (hz, db) = np.fft.rfftfreq(N, 1 / SR), np.transpose(points)
    return unit(irfft(rfft(noise()) * undb(np.interp(np.log(f + 1), np.log(hz), db)), N))


def gains(rows):
    """Gain curves from dB columns, silent outside their span."""
    t, (s, *cols) = np.arange(N) / SR, np.transpose(rows)
    return ((t >= s[0]) & (t < s[-1])) * undb([np.interp(t, s, c) for c in cols])


def band(x, lo_hz, hi_hz):
    """Band-pass filter, its upper edge kept at or under 0.45 of the sample rate."""
    return signal.sosfilt(signal.butter(2, [lo_hz, min(hi_hz, .45 * SR)], "band", fs=SR, output="sos"), x)


def noise():
    """White noise over the whole length."""
    return rng.standard_normal(N)


def undb(db):
    """Amplitude from dB."""
    return 10 ** (np.asarray(db) / 20)


def unit(x):
    """Scales to rms 1."""
    return x / np.sqrt(np.mean(x ** 2))


def peak(x, db):
    """Scales to a peak level in dB."""
    return x * undb(db) / np.abs(x).max()


def add(out, s, x):
    """Mixes x into out from s seconds on."""
    i = int(s * SR)
    out[i:i + len(x)] += x[:N - i]


def scene():
    """Knife, lemon and bowl ring in the room; rubbing, thumps, rumble and air are left dry."""
    near = knife() + rubbing() + kitchen(lemon(), -13.5) + kitchen(bowl(), -12.5) + thumps()
    return (near + rumble() + air())[None]


@njit
def duck(x, top, attack, release):
    """Gain control: follows the level quickly up and slowly down, and turns down what exceeds top."""
    y, e = np.empty(len(x)), 1e-6
    for i in range(len(x)):
        a = abs(x[i])
        e += (a - e) * (attack if a > e else release)
        y[i] = x[i] * min(1., top / e)
    return y


def record(dry):
    """The gain control lags the blows, so their first cycles can clip; the top is cut."""
    attack_s, release_s = 0.0013, .07
    held = duck(dry[0], float(undb(-6.5)), 1 / (attack_s * SR), 1 / (release_s * SR))
    held = np.clip(held, -1, 1)
    low_pass = signal.ellip(8, .2, 70, TOP_HZ, fs=SR, output="sos")
    return np.clip(signal.sosfilt(low_pass, held), -1, 1)[None]


dry = scene()
out = record(dry)
master_out(out)
```